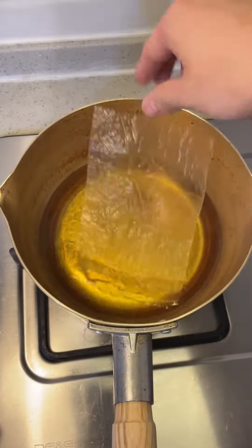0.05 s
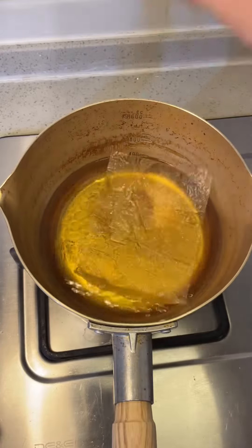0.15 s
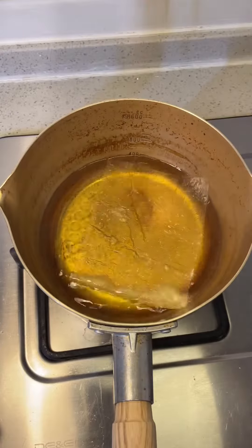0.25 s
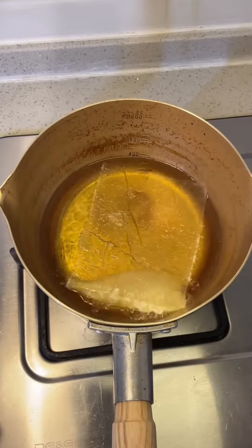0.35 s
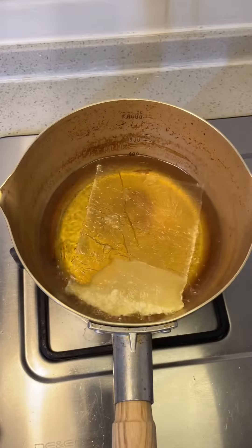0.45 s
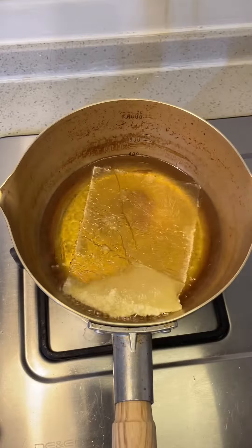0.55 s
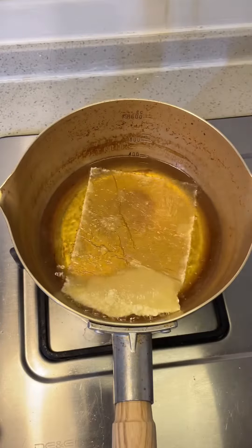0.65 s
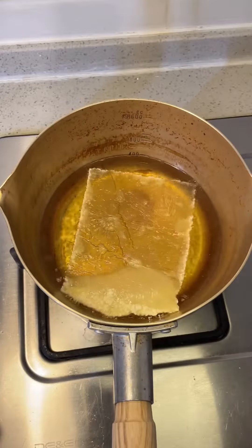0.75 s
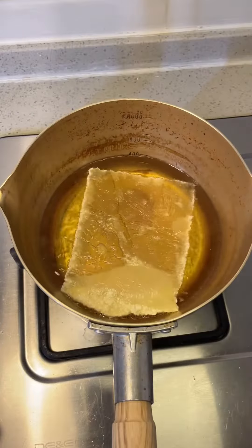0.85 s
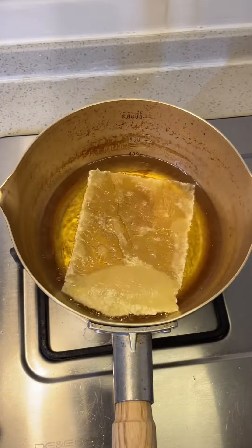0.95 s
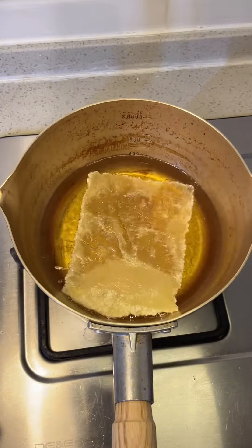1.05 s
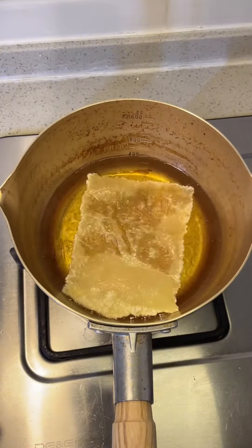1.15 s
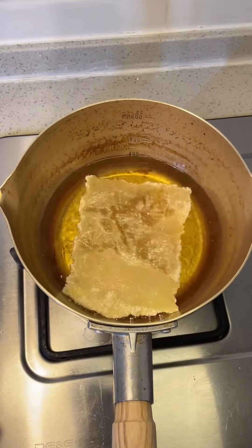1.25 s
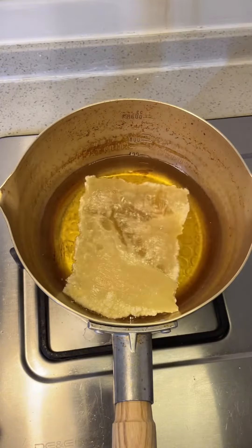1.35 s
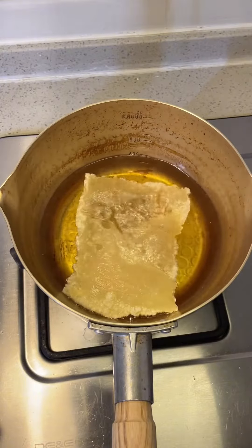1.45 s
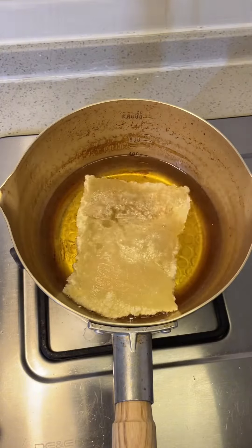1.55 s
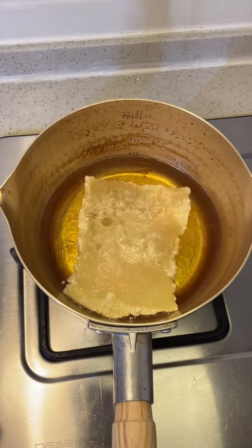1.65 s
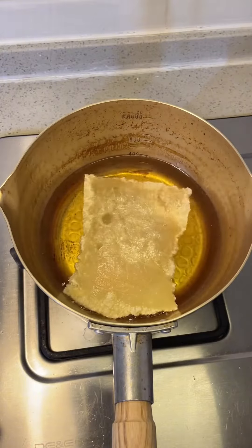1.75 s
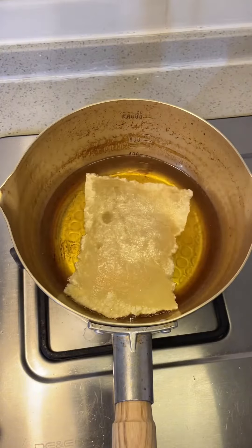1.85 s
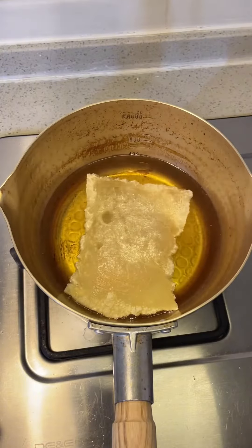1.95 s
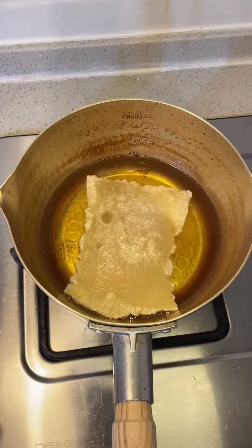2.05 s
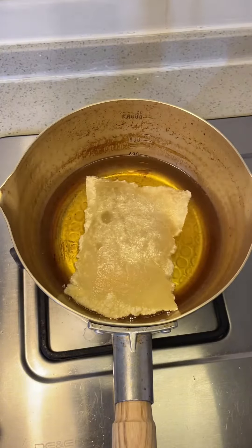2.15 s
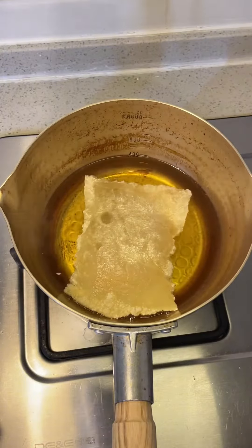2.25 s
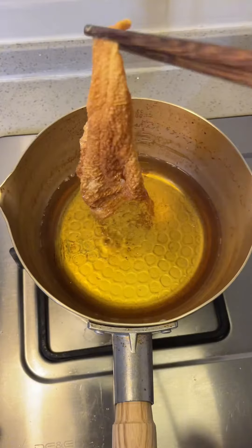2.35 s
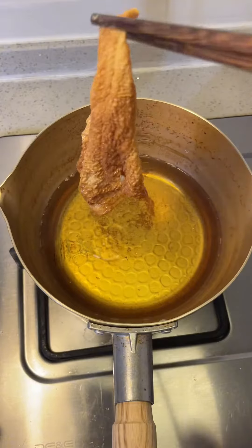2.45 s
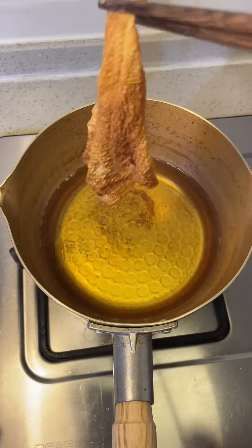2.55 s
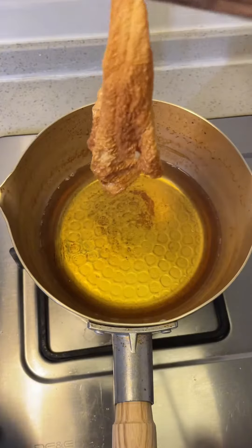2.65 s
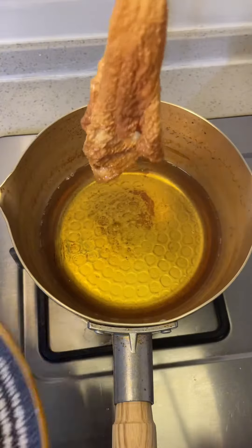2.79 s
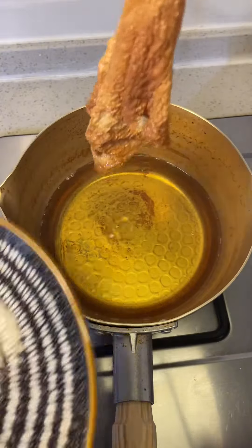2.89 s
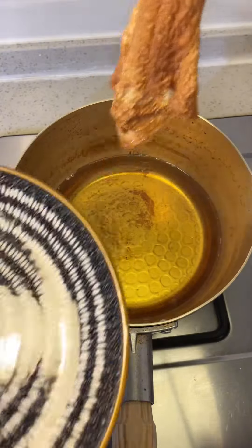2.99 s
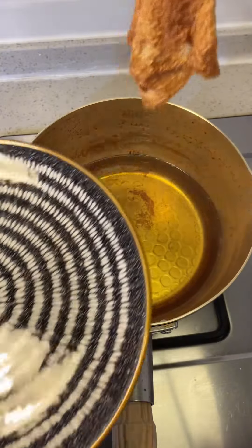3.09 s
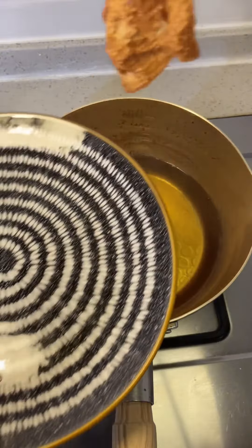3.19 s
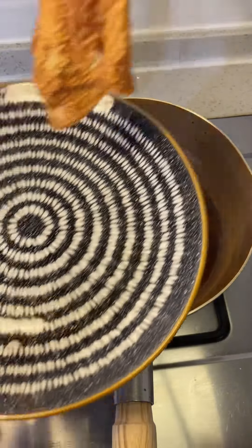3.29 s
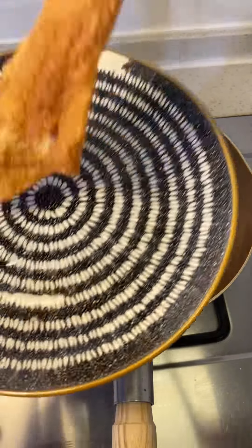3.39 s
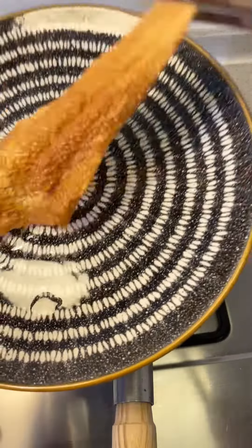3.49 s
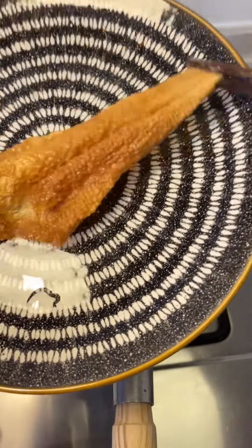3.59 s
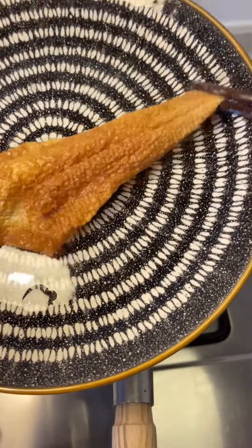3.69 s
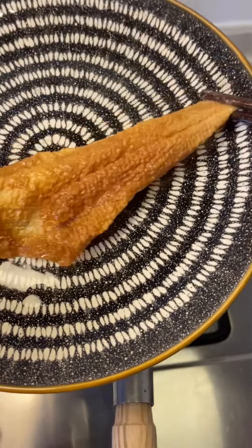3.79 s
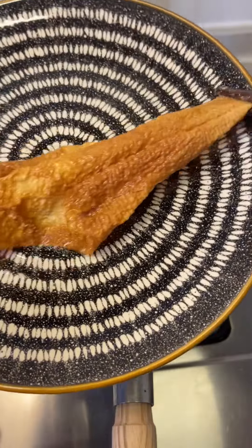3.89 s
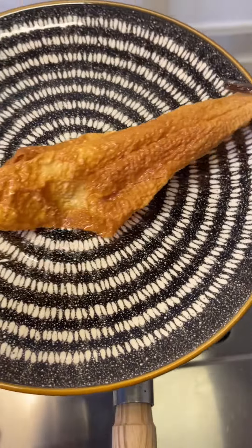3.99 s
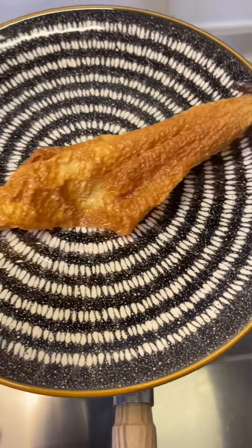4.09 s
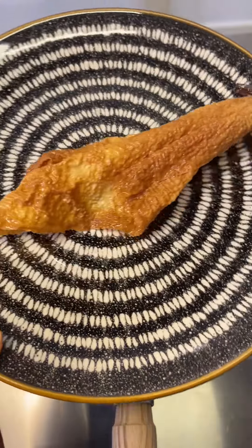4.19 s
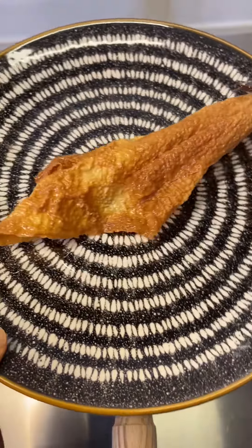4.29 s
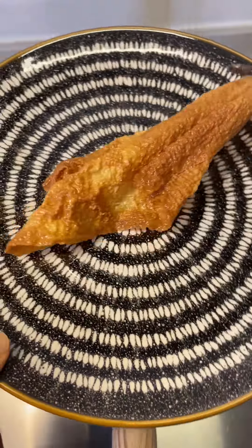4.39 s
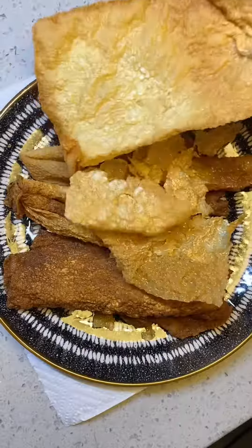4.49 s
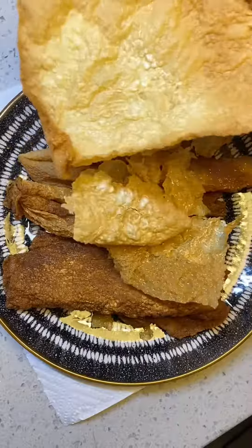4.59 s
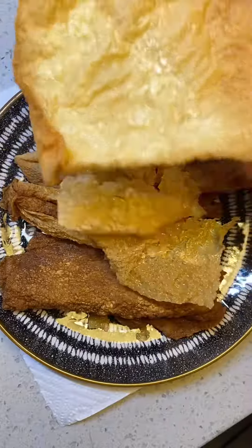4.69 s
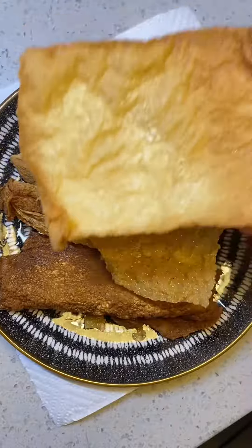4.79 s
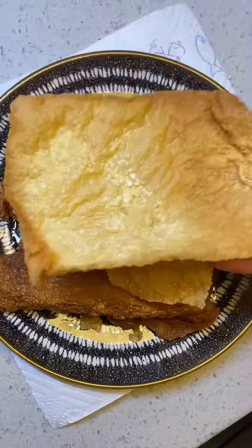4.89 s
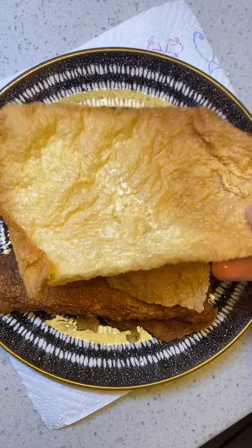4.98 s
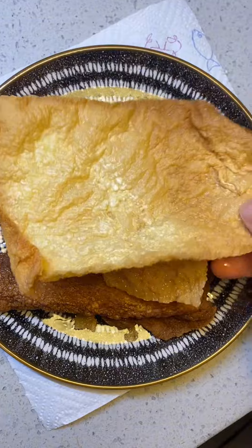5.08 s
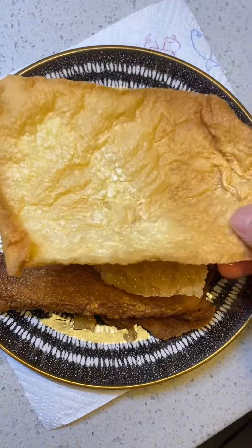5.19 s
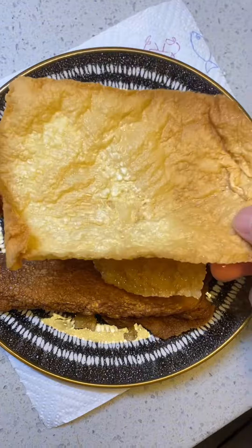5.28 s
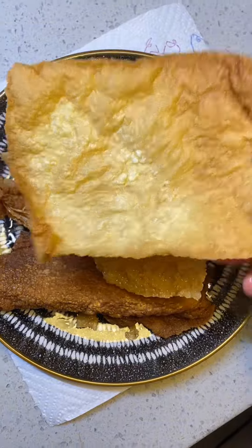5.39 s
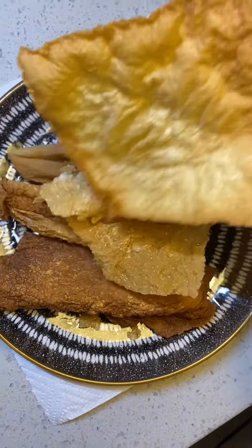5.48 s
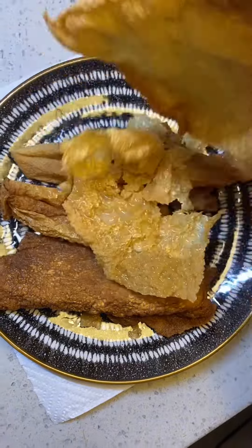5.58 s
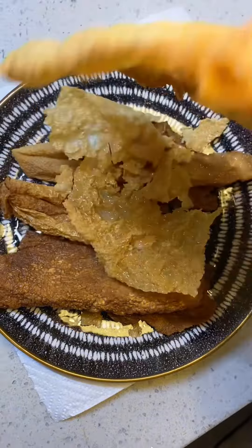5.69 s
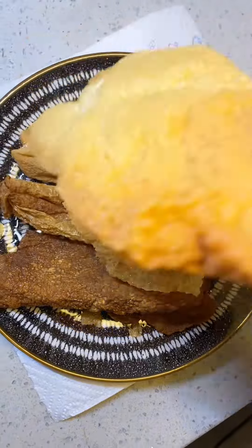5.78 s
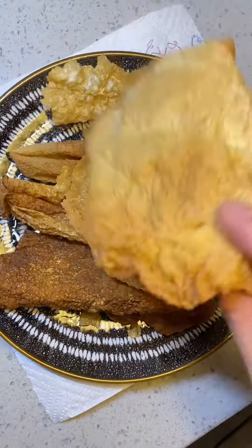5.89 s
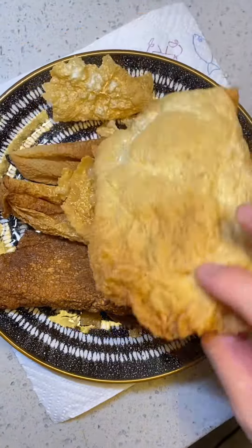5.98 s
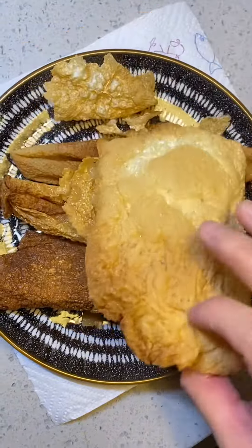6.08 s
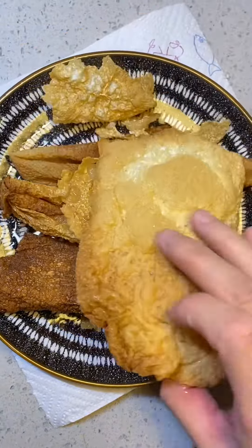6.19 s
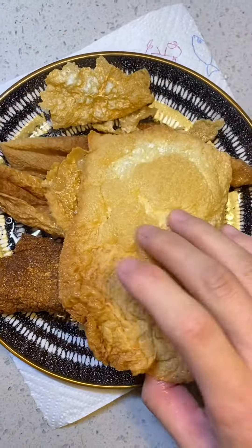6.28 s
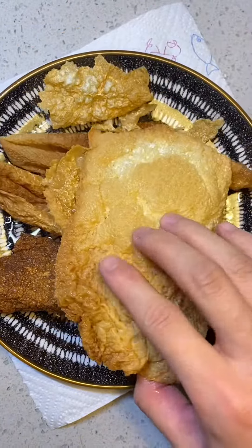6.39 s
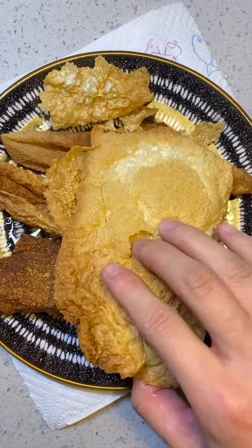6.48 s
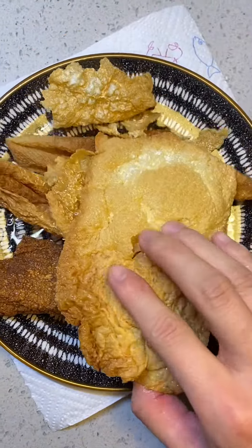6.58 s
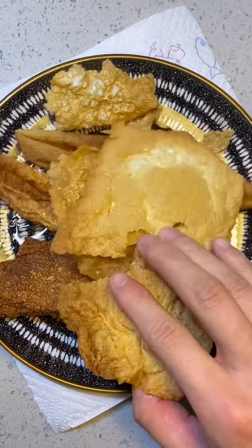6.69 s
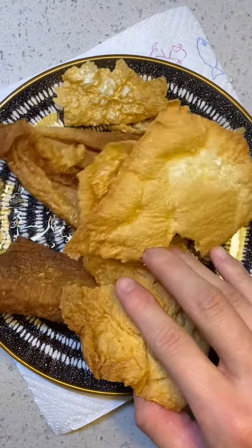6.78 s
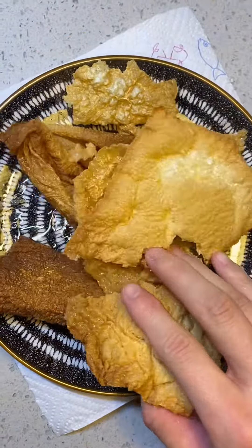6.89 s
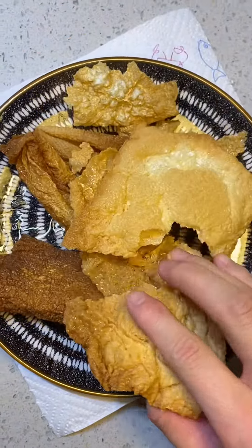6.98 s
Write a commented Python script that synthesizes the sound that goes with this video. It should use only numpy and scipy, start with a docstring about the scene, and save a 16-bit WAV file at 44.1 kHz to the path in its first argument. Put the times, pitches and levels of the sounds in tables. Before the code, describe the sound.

Close stereo microphones in a small kitchen. A thin sheet of tofu skin hits hot oil and sizzles in a quick swell, with bubbling flutters and sharp spits, then weakens. The pan clunks and rattles briefly, a fried piece taps a plate faintly, and after a near-quiet pause brittle sheets rustle and snap, ending in two loud bursts of crunching. A low hum lies underneath.

```python
"""Frying and crushing tofu skin

Three shots follow each other, opened and joined by short fades, heard by a close pair of microphone ports.
First a thin sheet of tofu skin sizzles in hot oil: ringing bubble grains over patchy hiss, swarms and spits.
Then the pan is knocked (noise through broad stove resonances, thin metal modes) and a fried piece meets a plate.
Last, brittle puffed sheets rustle, snap and are crushed by hand: fracture clumps under pitched, cracking snaps.
A kitchen hum with dull thumps lies underneath."""
import sys
import numpy as np
from scipy import signal
from scipy.fft import rfft, irfft, next_fast_len
from scipy.io import wavfile
from scipy.ndimage import uniform_filter1d, map_coordinates

SR = 44100
rng = np.random.default_rng(int(sys.argv[2]) if len(sys.argv) > 2 else 0)


def digitize_waveform(pressure):
    """Quantize a signal to 16-bit integers and store it at the path in sys.argv[1].

    Rows of a 2-D input are taken as channels; values are limited to [-1, 1].
    """
    field = np.atleast_2d(pressure).T
    bounded = np.clip(field, -1, 1)
    quanta = np.round(bounded * 32767).astype(np.int16)
    wavfile.write(sys.argv[1], SR, quanta)


N = 310905

# the boil swells as the sheet sinks and dies down as it dries:
# t/s, fizz level/dB, big bubbles below about 1.3 kHz: level/dB over the fizz
BOIL = [(.05, -73, 22.5), (.07, -51.5, -20), (.15, -50, -2), (.178, -51, 3.5), (.22, -44.5, 4),
        (.31, -38.5, 6), (.54, -40.5, 2), (.88, -40.5, -2.5), (1.19, -38.5, -3.5), (1.57, -42, 2.5),
        (1.76, -41.5, 4), (1.94, -45.5, 4.5), (2.15, -49, 6), (2.19, -49, 1), (2.25, -56, 4.5),
        (2.29, -51, 7), (2.3, -52, 1), (2.32, -66, 13)]
# bubbles near 1.8 kHz: t/s, level/dB over the fizz
MIDDLING = [(.07, -19), (.11, -3), (.25, -7.5), (.35, -5), (.69, -11.5), (1.44, -7), (1.55, -6),
            (2.02, -14.5), (2.07, -11), (2.23, -11.5), (2.29, -9)]
MIDDLING_USUAL_DB = -8.5  # at this value the fizz is left as it is
# fizz spectra, sum and difference of the two ports: f/Hz, density/dB per Hz
FIZZ_MID = [(210, -40), (350, -27), (445, -13), (754, -2), (1260, -6), (1760, 1.5), (2070, 0), (3790, 2),
            (8310, 2.5), (11300, -19), (14800, 3.5), (16000, -22)]
FIZZ_SIDE = [(210, -23), (350, -15.5), (459, -17), (754, -6), (1140, -8), (2540, -1), (4670, -0.5),
             (10400, 2.5), (14800, -4), (16000, 2)]
SPUTTER_DB, SPUTTER_FROM_DB = 0.12, -52  # level jumps per dB that the fizz has sunk below this


def frying():
    """Steam bubbles ring over a hiss; the boil flutters, sputters as it weakens, swarms sing and oil spits."""
    boil = patchy(depth_db=3.0, size=(4, 10))
    boil = boil + amp(-10.0) * grains(count=12000, cycles=19, spread_db=3.5)
    # bigger bubbles sing longer
    boil = boil + amp(-11) * grains(count=1600, cycles=60, spread_db=2, top_hz=7000, size=800)
    dry_crackle = grains(count=3000, cycles=5, spread_db=3)
    boil = boil + amp(-10) * dry_crackle
    flutter_db = 0.52 * wobble(9.43) + 1.2 * wobble(45.85)
    boil = coloured(unit(boil * amp(flutter_db)), FIZZ_MID, FIZZ_SIDE, side_db=0.5)

    fizz_db, low_db = curves(BOIL)
    t = np.arange(N) / SR
    weakness_db = np.clip(SPUTTER_FROM_DB - fizz_db, 0, 10)
    level = amp(fizz_db + SPUTTER_DB * weakness_db * wobble(25.8))
    level = level * (t > BOIL[0][0]) * (t < BOIL[-1][0])
    level = np.sqrt(level ** 2 + surges() * (t < BOIL[-2][0]))

    middling = filtered(boil, lambda f: 1 / (1 + ((f - 1750) / 450) ** 4))
    boil = boil + middling * (amp(curves(MIDDLING)[0] - MIDDLING_USUAL_DB) - 1)
    fizz = played(boil, level, level * amp(low_db), level)
    return fizz + swarms(fizz_db, count=14) + spits(count=24)


# sudden flares of the boil: t/s, peak level/dB, fade/dB per s
SURGES = [(0.189, -29, 250), (0.3494, -24, 250), (0.5028, -21, 250), (0.5494, -22, 250), (0.6994, -31, 250),
          (0.7994, -31, 250), (1.0994, -33, 250), (1.2794, -31, 250), (1.3994, -22.5, 250),
          (1.4894, -21.5, 250), (1.6801, -33, 250), (1.948, -27, 250), (2.0313, -28, 250),
          (2.1394, -31, 250), (2.2099, -26.5, 250), (2.2598, -29, 250)]
SURGE_CREST_DB = 18.5  # peak over rms


def surges():
    """Summed power of the flares: each starts at once and fades exponentially."""
    t = np.arange(N) / SR
    power = 0
    for s, db, fade in SURGES:
        power = power + (t > s) * amp(db - SURGE_CREST_DB - fade * np.clip(t - s, 0, .5)) ** 2
    return power


# the clearest swarms of like-sized bubbles: t/s, level/dB before the swell, f/Hz
SWARMS = [(.327, -44, 1480), (.36, -44, 3340), (.5, -42.5, 1690), (.79, -39, 2980), (.85, -43.5, 3100),
          (1.086, -43, 2940), (1.278, -44, 1760), (1.397, -40.5, 3500), (1.478, -47, 2210),
          (1.678, -42.5, 2980), (1.722, -42, 2460), (2.026, -41.5, 3850)]
SWARM_S, SMALL_SWARM_DB = .05, -13  # length; chance swarms relative to the fizz


def swarms(fizz_db, count):
    """Bubbles of one size sing together: narrow noise that swells and fades; weaker ones come by chance."""
    out, draw = np.zeros((2, N + SR)), rng.random((count, 2))
    first, last = BOIL[2][0], BOIL[-3][0] - SWARM_S
    starts = first + (last - first) * draw[:, 0]
    small = [(s, fizz_db[round(s * SR)] + SMALL_SWARM_DB, 1400 * 3 ** v) for s, v in zip(starts, draw[:, 1])]
    swell = np.sin(np.pi * np.linspace(0, 1, round(SWARM_S * SR)) ** 0.66) ** 2
    for s, db, hz in [*SWARMS, *small]:
        song = signal.lfilter(*signal.iirpeak(hz, 13, SR), rng.standard_normal((2, len(swell))))
        place(out, s, amp(db) * swell * unit(song) * [[1], [.7]])
    return out[:, :N]


# the loudest spits of oil, sharp and very high: t/s, peak level/dB before colouring
SPITS = [(.072, -48), (.551, -39), (1.487, -35), (1.553, -24), (1.682, -35), (1.695, -21), (1.91, -17),
         (1.974, -24), (2.031, -18.5), (2.069, -27), (2.077, -27), (2.145, -22), (2.194, -22), (2.211, -38)]
SPIT_T60_S, SMALL_SPIT_DB = 0.017, -39.5  # chance spits peak up to 12 dB above this, before colouring


def spits(count):
    """A water drop flashes to steam: a treble tick, mostly out of phase between ports; small ones by chance."""
    out, t = np.zeros((2, N + SR)), np.arange(SR // 20) / SR
    draw = rng.random((count, 2))
    first, last = BOIL[1][0], BOIL[-2][0]
    small = [(first + (last - first) * u ** 0.34, SMALL_SPIT_DB + 12 * v) for u, v in draw]
    for s, db in [*SPITS, *small]:
        tick = amp(-60 * t / SPIT_T60_S) * rng.standard_normal((2, len(t)))
        place(out, s, amp(db) * tick / np.abs(tick).max(axis=1, keepdims=True))
    mid_db = [(2000, -14), (6000, -18), (11000, -7.0), (15000, -10)]
    side_db = [(3000, -26), (7000, -12.0), (11000, 7.0), (15000, 3)]
    return filtered(out[:, :N], lambda f: amp([along(mid_db, f), along(side_db, f)]))


# rustle spectra of the lifted, turned sheet, sum and difference: f/Hz, density/dB per Hz
RUB_MID = [(210, -41), (350, -3.5), (424, -6.5), (530, -1), (584, -8), (643, -3.5), (1240, -3.5), (2350, 2),
           (2980, -6), (3620, -5), (4200, -6), (4680, -14), (5550, -7), (7000, -11), (9900, -16.5),
           (16000, -72)]
RUB_SIDE = [(210, -40), (350, -11), (857, -5.5), (1410, -53), (2130, -14), (3130, 4), (5940, -11),
            (8570, -13), (13000, -16), (15000, -11), (16000, -17)]
# rustle spectra of the pressed sheet, sum and difference: f/Hz, density/dB per Hz
CRUST_MID = [(210, -42), (350, -9), (566, -2.5), (959, 1.5), (1240, -4), (1340, 2.5), (1630, -1),
             (2670, 3.5), (3030, -5.5), (4000, -3), (4700, -11), (5600, -4), (7000, -8), (11300, -19.5),
             (16000, -90)]
CRUST_SIDE = [(210, -57), (350, -14), (959, -2), (1480, -27), (1820, -47), (1970, -25), (2670, 1.5),
              (3450, 1), (4600, 0.5), (6330, -13), (15000, -12), (16000, -3)]
# snaps of the crust: t/s, peak level/dB before colouring, shell f/Hz, treble level/dB before the crack boost
SNAPS = [(4.435, -45, 1910, -12), (4.4746, -27, 2360, 4), (4.5521, -31, 2640, -14),
         (4.5715, -33, 2700, -15), (4.732, -37.5, 1460, -8), (4.8568, -39, 2000, -4),
         (4.8624, -38, 2030, -10), (4.883, -42, 2060, -17), (4.9497, -34, 2060, -18),
         (4.972, -32, 2340, -21), (5.0348, -13.5, 2430, -5), (5.0484, -23, 3540, 3),
         (5.0923, -38, 1970, -7), (5.1104, -38, 2130, -19), (5.182, -36, 2030, -13),
         (5.345, -46, 2500, -20), (5.392, -40, 2560, -18), (5.414, -40, 2470, -10),
         (5.4495, -27, 1686, -23), (5.471, -32, 2430, -14), (5.4914, -27, 2300, -6),
         (5.5159, -20, 3520, -10), (5.547, -38, 2260, -28), (5.5557, -28.5, 910, -14),
         (5.6191, -38, 2300, -16), (5.6504, -38, 2730, -15), (5.7364, -30, 2510, -9),
         (5.758, -20.5, 2640, -6), (5.766, -29, 3970, -2), (5.863, -35, 2660, -14), (5.9259, -33, 1650, -1),
         (5.9433, -27, 1530, -18), (5.958, -29, 1600, -12), (5.9674, -28, 2400, 0), (5.998, -35, 2500, -4),
         (6.008, -21, 1300, -4), (6.038, -34, 2000, -6), (6.049, -28, 2800, -8), (6.058, -18, 1094, 2),
         (6.0972, -22, 2080, -12), (6.145, -43, 1320, -4), (6.199, -33, 830, -11), (6.2163, -33, 2120, -7),
         (6.2243, -29, 2510, -4), (6.2721, -26, 2200, -15), (6.277, -30, 1460, -20),
         (6.293, -33, 2200, -16), (6.323, -20, 2300, -18), (6.394, -33, 4360, -8), (6.4079, -22, 950, -2),
         (6.438, -29, 1000, -8), (6.443, -19, 925, -5), (6.4475, -10, 2330, 6), (6.4562, -4, 3570, -0.5),
         (6.462, -14, 1300, -6), (6.467, -5, 2400, -7), (6.4735, -8, 2300, -10), (6.489, -12, 2200, -10),
         (6.505, -13, 1800, -6), (6.519, -17, 2200, -10), (6.4806, -8.5, 1310, -14),
         (6.4975, -9, 1700, -14), (6.5245, -2, 2090, -9), (6.538, -12, 1500, -5.5), (6.551, -32, 1780, -7),
         (6.588, -30, 2600, -9), (6.612, -38, 2400, -10), (6.6781, -8, 2550, 4), (6.682, -9.5, 960, -10),
         (6.696, -9, 1490, -4), (6.701, -9, 1980, -10), (6.7115, -5, 2760, -9), (6.7165, -10, 2500, -5),
         (6.7225, -9, 2400, -16), (6.7275, -6.5, 2720, -14), (6.733, -2, 1960, -7), (6.742, -24, 2500, 0),
         (6.7654, -19, 3970, -26), (6.798, -33, 2600, -20), (6.802, -15, 2300, -26),
         (6.815, -29, 2100, -20), (6.825, -29, 2400, -20), (6.8324, -23, 2770, -23),
         (6.853, -29, 1886, -23), (6.8793, -38, 2440, -21), (6.886, -29, 1510, -16),
         (6.921, -33, 2060, -18), (6.926, -32, 2650, -14), (6.9536, -22, 1790, -24),
         (6.9823, -25.5, 2390, -23), (7.003, -21.5, 2350, -22), (7.0319, -40, 2400, -12)]
PRESS_S = 5.926  # from here the sheet is pressed, before it is only lifted and turned


def crust():
    """Clumps of tiny fractures under each move of the hand, with the snaps on top."""
    clumps = amp(0.75 * wobble(60) + 1.02 * wobble(250))
    rustle = patchy(depth_db=2.5, size=(4, 2)) + amp(-3.0) * grains(count=6000, cycles=12, spread_db=4.2)
    rustle = unit(clumps * rustle)
    rubbed = coloured(rustle, RUB_MID, RUB_SIDE, side_db=-4.0)
    pressed = coloured(rustle, CRUST_MID, CRUST_SIDE, side_db=-2.5)
    rustle = np.where(np.arange(N) / SR < PRESS_S, rubbed, pressed)

    gains = moves()
    snaps = bursts([*SNAPS, *small_snaps(gains[0], count=220)], crack_db=10.0)
    mid_db = [(7000, -6.5), (14000, -21.5)]
    side_db = [(1500, -30), (5000, -6.0), (14000, -8)]
    snaps = filtered(snaps, lambda f: amp([along(mid_db, f), along(side_db, f)]))
    return played(rustle, *gains) + snaps + room(snaps, level_db=-13) + drag()


# moves of the hand on the fried sheets: t/s, swell/s, hold/s, rustle level/dB, fade/dB per s,
# body below about 1.3 kHz: level/dB over the rustle, treble level/dB over the rustle
MOVES = [(3.55, 0.055, .02, -73, 60, -15, -4), (3.837, 0.077, .004, -64.5, 294, -12, -11),
         (4.423, 0.012, 0.026, -60, 300, 0.5, 3.5), (4.462, 0.012, 0.012, -58.5, 498, 7.5, 16),
         (4.551, .002, 0.004, -54.5, 500, 4.5, 4.5), (4.561, 0.0035, .008, -57, 450, 5.5, 5),
         (4.717, 0.0059, 0.059, -57, 321, 2.5, 4), (4.841, 0.013, 0.0092, -59, 900, 3, 15),
         (4.88, .002, 0.12, -56.5, 200, 6, 4.5), (4.897, 0.052, 0.096, -53, 600, 6, 5),
         (5.079, 0.028, 0.023, -56.5, 350, 5, 4), (5.158, 0.025, 0.025, -57.5, 302, 2, 5.5),
         (5.279, 0.057, 0.0036, -60.5, 150, 3, 0), (5.361, 0.051, 0.03, -52.5, 200, 0, 4.5),
         (5.447, 0.0024, 0.13, -46, 138, 0, 5), (5.708, 0.03, 0.0042, -53, 499, -4, 8),
         (5.757, 0.0018, .006, -47, 300, -6, 4), (5.801, 0.035, 0.027, -58, 100, 3, 11.5),
         (5.922, 0.0031, 0.037, -47.5, 350, 8, 9), (6.003, 0.0015, .003, -47, 696, 12.5, 10),
         (6.029, 0.011, .003, -50.5, 900, 2, -4), (6.057, 0.0011, 0.0026, -40.5, 1100, 3, 7),
         (6.086, 0.0037, 0.0072, -50, 800, 8.5, 6), (6.097, 0.022, 0.072, -59.5, 200, 8, -3),
         (6.183, 0.035, 0.006, -47.5, 298, 1.5, 5.5), (6.246, 0.025, .004, -45.5, 221, 0.5, -17),
         (6.319, 0.0012, 0.0032, -52.5, 698, 12, -14), (6.387, 0.0048, .002, -53, 891, 5, 2),
         (6.405, 0.0032, 0.0027, -42.5, 902, 6, 0), (6.418, 0.025, .008, -40, 300, 2, 15),
         (6.458, 0.0012, 0.02, -26, 212, -5, 9), (6.518, 0.0028, 0.014, -27.5, 1200, -3, 7.5),
         (6.54, .003, .004, -49, 96, -14, -8), (6.677, 0.00065, 0.0021, -22, 1004, -9, 8),
         (6.691, 0.0051, 0.011, -26.5, 605, -11, 7.5), (6.708, 0.0082, 0.014, -24.5, 500, -13, 9),
         (6.743, 0.0039, 0.028, -39.5, 246, -2, -8), (6.82, 0.025, 0.071, -47.5, 161, -4.5, -20),
         (6.945, 0.0047, 0.0049, -46.5, 400, -2, -19), (6.995, 0.003, 0.0053, -43, 292, -4, -1.5)]
SETTLE_DB, SETTLE_DB_PER_S = -23.5, 57  # after each move the pile settles faintly


def moves():
    """Gains of middle, body and treble: each move swells, holds, fades and settles; powers add."""
    t, power = np.arange(0, N, 8) / SR, 1e-12  # every 8th sample is enough
    for s, swell, hold, db, fade, body_db, treble_db in MOVES:
        after = np.maximum(t - s - swell - hold, 0)
        rise = np.clip((t - s) / max(swell, 1e-4), 0, 1) ** 2
        shape = rise * (amp(-fade * after) + amp(SETTLE_DB - SETTLE_DB_PER_S * after))
        power = power + (amp(db + np.array([[0], [body_db], [treble_db]])) * shape) ** 2
    return np.repeat(np.sqrt(power), 8, axis=1)[:, :N]


SNAP_CYCLES, SNAP_RISE_S = 28.3, 0.00052  # a shell rings this many cycles to lose 60 dB
CRACK_T60_S = 0.04  # added to the shell's own fade, so the bright crack dies faster still
SHEET_HZ, SHEET_DB, SHEET_T60_S = 973, -9, 0.04  # drum of the pressed sheet; level before snap scaling


def bursts(events, crack_db):
    """A sudden break rings the shell and cracks in bright noise; a pressed sheet drums under each snap."""
    out, t = np.zeros((2, N + SR)), np.arange(SR // 30) / SR
    for s, db, hz, treble_db in events:
        fade = amp(-60 * t * hz / SNAP_CYCLES) * (1 - np.exp(-t / SNAP_RISE_S))
        noise = rng.standard_normal((2, 2, len(t)))
        shell = unit(signal.lfilter(*signal.iirpeak(hz, 4, SR), noise[0]))
        shell = shell + 1.73 * np.sin(2 * np.pi * hz * t)
        crack = np.diff(noise[1], prepend=0) * amp(treble_db + crack_db - 60 * t / CRACK_T60_S)
        snap = fade * (shell * [[1], [.4]] + crack)
        drum_hz = SHEET_HZ * (1 + 0.032 * noise[0, 0, 0])  # a little different each time
        drum = amp(SHEET_DB - 60 * t / SHEET_T60_S) * np.sin(2 * np.pi * drum_hz * t)
        snap = snap + (s > PRESS_S) * drum * [[1], [.1]]
        place(out, s, amp(db) * snap / np.abs(snap[0]).max())
    return out[:, :N]


SMALL_SNAP_DB, SMALL_SNAP_HZ = 2, 2100  # usual peak over the rustle, usual pitch


def small_snaps(level, count):
    """Chance snaps while the sheets are handled, as strong as the rustle at that moment allows."""
    at, draw = rng.uniform(MOVES[2][0], N / SR, count), rng.standard_normal((count, 3))
    db = 20 * np.log10(level[(at * SR).astype(int)]) + SMALL_SNAP_DB + 1.6 * draw[:, 0]
    hz = np.clip(SMALL_SNAP_HZ * np.exp(0.28 * draw[:, 1]), 600, 8000)
    treble_db = -10.5 + 5.5 * draw[:, 2]
    return np.transpose([at, db, hz, treble_db])


# rumble of the sheet dragged over the pile: f/Hz, density/dB per Hz
DRAG_COLOUR = [(29, -40), (50, -9.5), (206, -1), (269, -14), (342, -7), (575, -17), (900, -20), (1170, -49),
               (1980, -120)]
DRAG_S, DRAG_RISE_S, DRAG_HOLD_S, DRAG_FALL_S, DRAG_DB = 5.445, .03, .095, .03, -45


def drag():
    """A steady low rumble of filtered noise while the sheet slides."""
    knots = np.cumsum([DRAG_S, DRAG_RISE_S, DRAG_HOLD_S, DRAG_FALL_S])
    shape = np.interp(np.arange(N) / SR, knots, [0, 1, 1, 0])
    rumble = filtered(rng.standard_normal((2, N)), lambda f: amp(along(DRAG_COLOUR, f)))
    return amp(DRAG_DB) * shape * unit(rumble) * [[1], [.2]]


# the pan is knocked and rattles on the stove: t/s, drive level/dB, t60 of the clunk/s
KNOCKS = [(2.318, -39, 0.036), (2.327, -35, 0.041), (2.344, -36.5, 0.025), (2.358, -48, 0.03),
          (2.365, -66, 0.14), (2.407, -55, 0.14)]
# broad resonances of the stove: f/Hz, width/Hz, level/dB
STOVE = [(290, 63, 10.5), (563, 60, 8.5), (1050, 146, 9), (1590, 170, 2), (1980, 320, -1)]
# ringing modes of the pan: f/Hz, usual level/dB, t60/s
PAN = [(1044, -17, .2), (1319, -24, .18), (1583, -21, .15), (2180, -25, .1), (2993, -15.5, .16),
       (3030, -26, .1), (4102, -32, .1), (4603, -36, .14), (4834, -18, .045), (6718, -27, .09)]
STOVE_TOP_HZ = 2600  # the clunk is dark above this


def pan():
    """Each knock shakes the stove's broad low resonances and leaves a thin, rattling ring of metal."""
    shake, metal, t = np.zeros((2, N + SR)), np.zeros((2, N + SR)), np.arange(SR // 4) / SR
    rise = 1 - np.exp(-t / .002)
    for s, db, t60 in KNOCKS:
        place(shake, s, amp(db + 14.5 - 60 * t / t60) * rise * rng.standard_normal((2, len(t))))
        place(metal, s, amp(db) * rise * ring(PAN, t))

    def body(f):
        """Resonances in parallel with alternating signs, then a two-pole roll-off."""
        total = 0
        for k, (hz, width, db) in enumerate(STOVE):
            total = total + (-1) ** k * amp(db) * 1j * f * width / (hz * hz - f * f + 1j * f * width)
        return total / (1 + 1j * f / STOVE_TOP_HZ) ** 2

    rattle = metal[:, :N] * amp(4 * wobble(80))
    out = (filtered(shake[:, :N], body) + rattle) * amp([[0], [-5]])
    return out + room(out, level_db=-6.5)


# chopstick contacts with the plate, before colouring: t/s, ring level/dB, click drive/dB over the ring, click f/Hz
TAPS = [(3.436, -56, 11, 4800), (3.506, -46, 9, 2200), (3.523, -66, 16, 2700), (3.585, -76, 21, 2300),
        (3.642, -80, 28, 6200), (3.647, -82, 24, 2300)]
# ringing modes of the china: f/Hz, usual level/dB, t60/s
PLATE = [(1789, -7, .12), (2522, -14, .06), (2975, -15, .09), (4585, -16, .06), (5319, -19, .04),
         (6686, -27, .05)]


def plate():
    """Each contact is a dry click, a short scratch and a faint ring of the china."""
    out, t = np.zeros((2, N + SR)), np.arange(SR // 4) / SR
    for s, db, click_db, hz in TAPS:
        scratch = unit(signal.lfilter(*signal.iirpeak(hz, 2, SR), rng.standard_normal((2, len(t)))))
        fade = amp(-60 * t / .008) + amp(-20 - 60 * t / .12)  # the click, then the scratch
        click = amp(click_db - 6) * fade * scratch
        place(out, s, amp(db) * (ring(PLATE, t) + click))
    mid_db = [(700, 8), (1800, 1.5), (6000, 5.5), (11000, -15)]
    side_db = [(2000, -16.0), (8000, 1)]
    out = filtered(out[:, :N], lambda f: amp([along(mid_db, f), along(side_db, f)]))
    return out + room(out, level_db=-12)


def ring(modes, t):
    """One blow on a set of modes: decaying sines at new strengths and phases."""
    out = 0
    for (hz, db, t60), more_db in zip(modes, rng.normal(0, 2, (len(modes), 2, 1))):
        out = out + amp(db + more_db - 60 * t / t60) * np.sin(2 * np.pi * (hz * t + rng.random((2, 1))))
    return out


# reverberation of the kitchen: f/Hz, t60/s
KITCHEN = [(200, 0.37), (2000, 0.36), (12000, 0.13)]
ROOM_STEP_S = .5  # a fresh random tail is drawn for each half second


def room(x, level_db):
    """The kitchen's answer: convolution with decaying noise, unrelated in sum and difference."""
    out, step = np.zeros((2, N + 2 * SR)), round(ROOM_STEP_S * SR)
    hz, t, z = signal.stft(rng.standard_normal((N // step + 1, 2, SR // 2)), SR, nperseg=256)
    tails = signal.istft(z * amp(-60 * t / along(KITCHEN, hz)[:, None]), SR, nperseg=256)[1]
    for at, tail in zip(range(0, N, step), tails):
        answer = signal.fftconvolve(x[:, at:at + step], tail / np.linalg.norm(tail[0]), axes=1)
        out[:, at:at + answer.shape[1]] += answer
    return amp(level_db) * out[:, :N]


# air hiss spectra, sum and difference: f/Hz, density/dB per Hz
AIR_MID = [(150, -61), (250, -38), (287, -3), (421, -10.5), (1020, -13.5), (1610, -16), (2160, -12.5),
           (2760, -15), (4730, -15.5), (8260, -21), (9330, -40), (16000, -51)]
AIR_SIDE = [(150, -24), (250, -2), (278, -15), (313, -6.5), (816, -6), (2360, -21.5), (3770, -13.5),
            (4190, -20), (7700, -15.5), (16000, -23.5)]
AIR_DB = -74
# slow level of the low sounds: t/s, hum near 50 Hz level/dB, hum near 100 Hz level/dB, rumble level/dB
HUM = [(0, -86, -65, -88), (.3, -69, -68.5, -62), (.8, -75, -68, -68), (2.25, -79, -70.5, -66),
       (2.4, -59, -58, -68), (2.7, -69.5, -69.5, -73), (4.35, -65.5, -66.5, -73.5),
       (4.5, -63, -62.5, -70.5), (5.6, -64, -58, -69.5), (7.05, -60, -59.5, -59.5)]
# faint wavering tones in the air: f/Hz, width/Hz, usual level/dB
WHINES = [(302, 18, -82), (734, 63, -86.5), (2223, 44, -86)]


def kitchen():
    """A faint hiss of air with thin tones, a wavering hum in two low bands over a rumble, and dull thumps."""
    air = amp(AIR_DB) * coloured(patchy(depth_db=2.5, size=(6, 6)), AIR_MID, AIR_SIDE, side_db=-1.0)
    bands = [(51.6, 11, -33), (93.3, 60, -22.0), (201, 327, -11.0)]  # f/Hz, width/Hz, difference level/dB
    low = 0
    for level_db, (hz, width, side_db) in zip(curves(HUM), bands):
        band = filtered(rng.standard_normal((2, N)), lambda f: 1 / (1 + np.abs((f - hz) / width * 2) ** 3))
        low = low + amp(level_db + 2.56 * wobble(9)) * unit(band) * amp([[0], [side_db]])
    for hz, width, db in WHINES:
        whine = filtered(rng.standard_normal(N), lambda f: 1 / (1 + ((f - hz) / width * 2) ** 2))
        low = low + amp(db + 3.5 * wobble(8.3)) * unit(whine) * [[1], [.3]]
    return air + low + thumps()


# dull thumps and brief swells of the hum: middle t/s, drive level/dB, f/Hz, length/s
THUMPS = [(0.252, -60.5, 80, .1), (1.287, -56.5, 263, 0.063), (1.863, -52.5, 153, 0.078),
          (2.118, -53, 250, 0.08), (2.328, -48.5, 247, 0.04), (2.492, -60, 52.4, .14),
          (3.025, -62.5, 50.7, .12), (3.171, -58.5, 55, 0.14), (3.323, -64.5, 235, 0.076),
          (3.696, -57, 97, 0.095), (3.896, -63, 50, .16), (4.238, -55.5, 94, 0.11),
          (4.475, -57, 133, 0.069), (4.624, -55.5, 60.7, .1), (4.827, -56.5, 96, 0.11),
          (5.008, -55, 149, .09), (5.302, -60, 96, .1), (5.589, -52, 420, 0.043), (5.668, -52, 49.3, .14),
          (6.1, -59, 109, 0.09), (6.479, -55, 170.4, 0.091), (6.733, -48, 260, 0.12),
          (6.971, -58, 96, 0.083)]
THUMP_WIDTH_HZ, WIDER = 186, 1.95  # width of each of two filters at 200 Hz; it grows as pitch to this power


def thumps():
    """Each one a soft swell of low noise around its pitch, nearly alike at both ports when low."""
    out = np.zeros((2, N + SR))
    for s, db, hz, length in THUMPS:
        swell = np.hanning(round(length * SR))
        noise = rng.standard_normal((2, SR // 2))
        width = THUMP_WIDTH_HZ * (hz / 200) ** WIDER
        for _ in range(2):
            noise = signal.lfilter(*signal.iirpeak(hz, hz / width, SR), noise)
        settled = unit(noise[:, -len(swell):])
        place(out, s - length / 2, amp(db) * swell * settled * [[1.4], [hz / 1200]])
    return out[:, :N]


def amp(db):
    """Gain of a level in dB."""
    return 10 ** (np.asarray(db) / 20)


def unit(x):
    """Scaled to rms 1."""
    return x / np.sqrt(np.mean(x ** 2) + 1e-20)


def place(out, s, sound):
    """Adds a sound into out, starting at s seconds."""
    out[:, round(s * SR):][:, :sound.shape[1]] += sound


def along(points, hz):
    """(f/Hz, value) points read on a log frequency axis."""
    f, v = np.transpose(points)
    return np.interp(np.log(hz + 1), np.log(f + 1), v)


def curves(rows):
    """One value per sample for each column after the time."""
    s, *cols = np.transpose(rows)
    return [np.interp(np.arange(N) / SR, s, c) for c in cols]


def wobble(rate):
    """A smooth random curve, rate knots a second."""
    knots = rng.standard_normal(int(N * rate / SR) + 4)
    return map_coordinates(knots, [np.arange(N) * rate / SR])


def filtered(x, response):
    """x times a response of frequency."""
    m = next_fast_len(N + SR // 2)
    return irfft(rfft(x, m) * response(np.fft.rfftfreq(m, 1 / SR)), m)[..., :N]


def patchy(depth_db, size):
    """Two noises with shared patches of random gain, size = (steps of 86 Hz, steps of 6 ms)."""
    z = signal.stft(rng.standard_normal((2, N)), nperseg=512)[2]
    field = uniform_filter1d(rng.standard_normal(z.shape[1:]), size=size[0], axis=0)
    field = uniform_filter1d(field, size=size[1], axis=1)
    return unit(signal.istft(z * amp(depth_db * unit(field)), nperseg=512)[1][:, :N])


def grains(count, cycles, spread_db, top_hz=16000, size=128):
    """Tiny damped rings at random times and pitches, flat in spectrum; two phases for sum and difference."""
    draw, k = rng.random((count, 5)), np.arange(size)
    hz = 400 + (top_hz - 400) * draw[:, 1:2]
    strength = amp(spread_db * np.minimum(-np.log(1 - draw[:, 2:3]), 3.5))
    gain = strength * np.sqrt(hz) * amp(-60 * k / SR * hz / cycles)
    at = ((draw[:, :1] * N).astype(int) + k).ravel()
    pair = []
    for phase in (draw[:, 3:4], draw[:, 4:5]):
        rings = gain * np.sin(2 * np.pi * (hz * k / SR + phase))
        pair.append(np.bincount(at, rings.ravel(), minlength=N)[:N])
    return unit(np.array(pair))


def coloured(pair, mid, side, side_db):
    """Sum and difference take their own spectra; a flat unit sum gets rms 1 from 1.5 to 8 kHz."""
    hz = np.linspace(1500, 8000, 200)
    scale = np.sqrt(np.mean(amp(along(mid, hz)) ** 2) * 6500 / (SR / 2))
    return filtered(pair, lambda f: amp([along(mid, f), along(side, f) + side_db])) / scale


def played(pair, level, low_level, high_level):
    """The middle, the lows and the treble of a sound follow their own gains."""
    low = filtered(pair, lambda f: 1 / (1 + (f / 1300) ** 4))
    high = filtered(pair, lambda f: 1 / (1 + (6000 / (f + 1)) ** 4))
    return (pair - low - high) * level + low * low_level + high * high_level


# short fades at the start and where the shots join, down to a fifth: t/s, half length/s
CUTS = [(0, .05), (2.309, .016), (4.42, .01)]
LAG_S = 2e-5  # the right port is a little further away


def scene():
    """All layers add up; sum and difference become left and right; short fades open and join the shots."""
    mid, side = frying() + crust() + pan() + plate() + kitchen()
    # lows sit to the right; left hears first
    balance = [(60, 0.0034), (500, 0.13), (3000, 0.025), (6000, 0.016)]
    lean = filtered(mid, lambda f: along(balance, f) - 1j * np.sin(np.pi * f * LAG_S))
    t = np.arange(N) / SR
    fades = np.prod([np.clip(np.abs(t - s) / half, .2, 1) for s, half in CUTS], axis=0)
    return np.array([mid + side - lean, mid - side + lean]) * fades


TOP_HZ = 15750


def record(dry):
    """A steep band limit: nothing above TOP_HZ is kept."""
    return filtered(dry, lambda hz: hz < TOP_HZ)


dry = scene()
out = record(dry)
digitize_waveform(out)
```